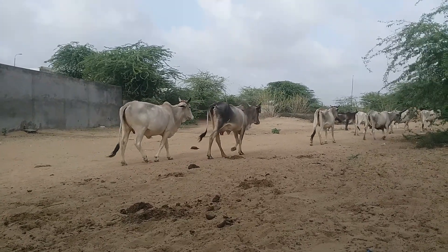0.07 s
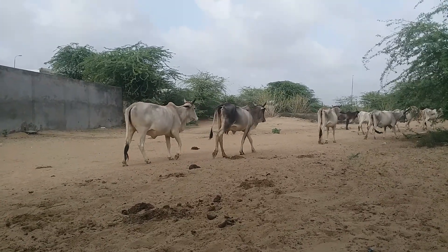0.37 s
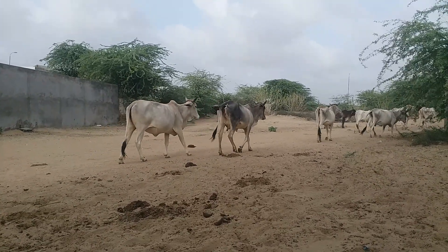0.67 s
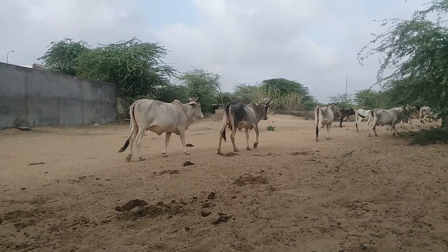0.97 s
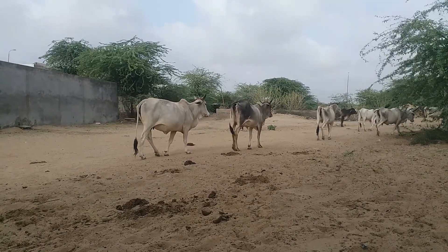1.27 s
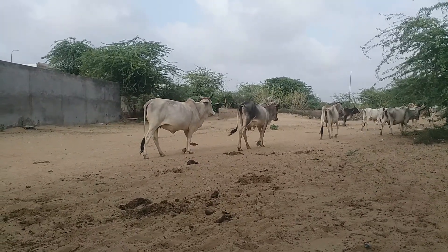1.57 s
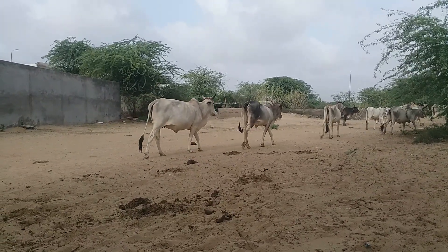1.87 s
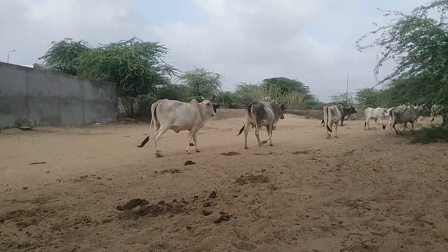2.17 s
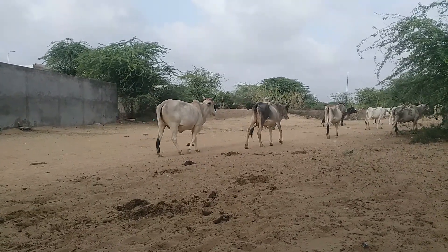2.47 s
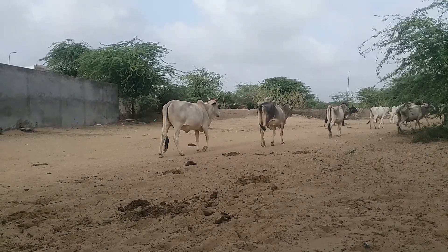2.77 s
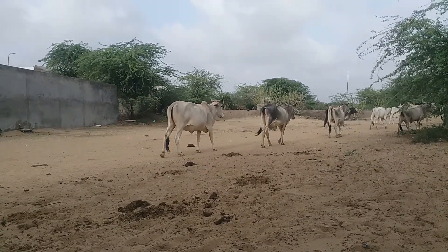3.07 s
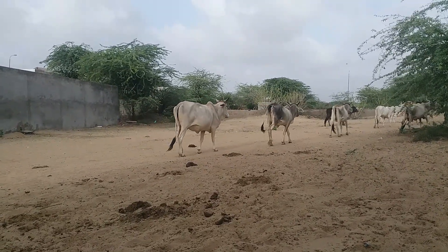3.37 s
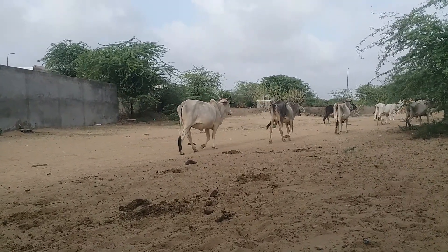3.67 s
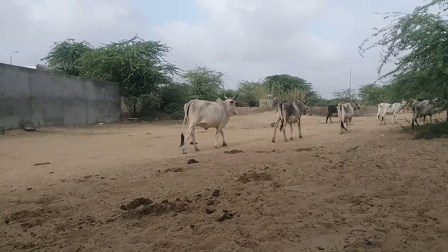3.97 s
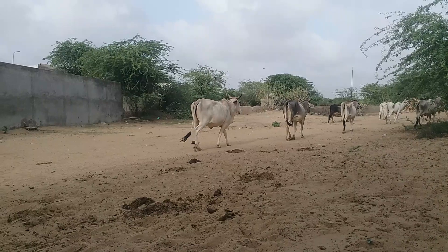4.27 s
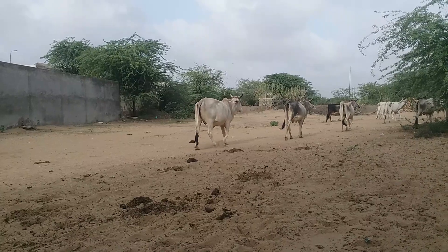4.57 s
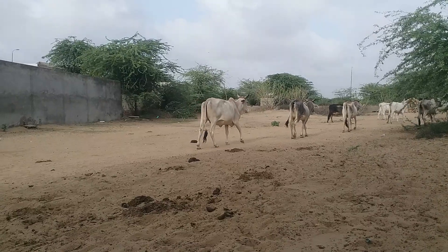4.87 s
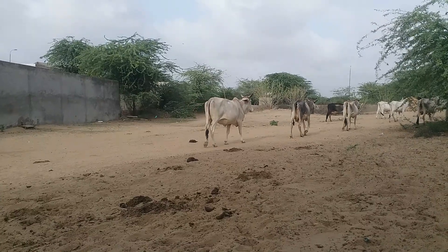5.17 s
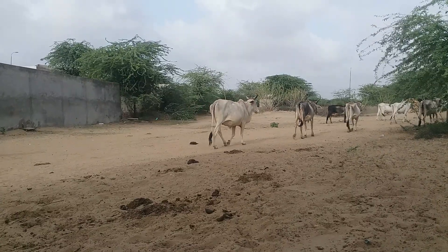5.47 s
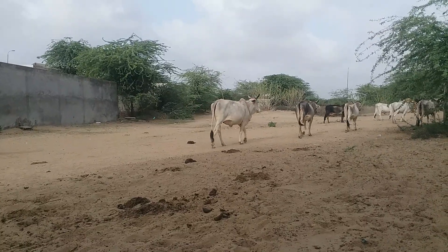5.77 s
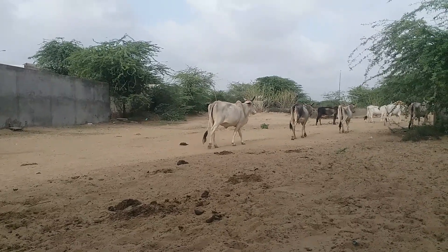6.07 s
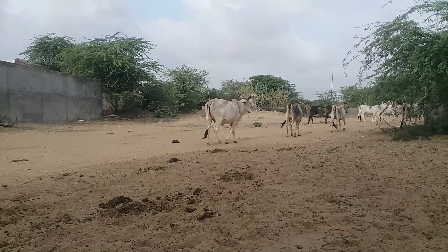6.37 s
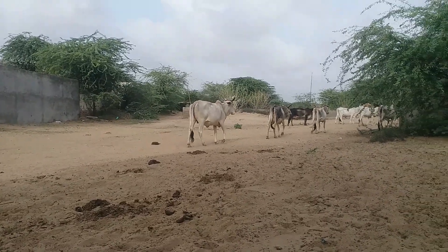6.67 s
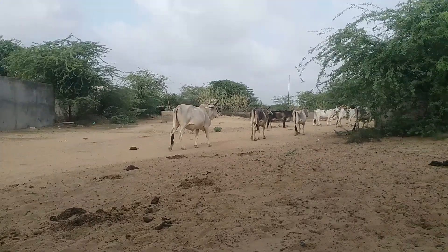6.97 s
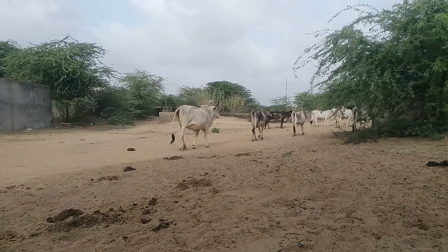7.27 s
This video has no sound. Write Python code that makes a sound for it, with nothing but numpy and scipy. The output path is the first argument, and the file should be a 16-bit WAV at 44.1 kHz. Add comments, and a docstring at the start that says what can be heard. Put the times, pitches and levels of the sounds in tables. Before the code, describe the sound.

In an open, dusty lot, small birds whistle short peeps and give raspy nasal calls from the trees over a faint distant chorus. A closer bird chirps three times. Low gusts of wind buffet the microphone, strongest early on and again past the middle. A few dry handling clicks sound up close, and a far engine hums faintly in the second half.

```python
"""A bird close to the microphone repeats a chirp, sweeping both sides of its syrinx at once.
Farther off in the thorn trees of a dusty village lot, small birds whistle and a flock rasps with
beating membranes, over a distant chorus; wall and foliage scatter a thin tail behind the calls.
Gusts buffet the microphone and the hand-held camera clicks. Far away an engine picks up speed
and thin tones come and go, above a floor of open air and microphone hiss."""
import sys
import numpy as np
from scipy import signal
from scipy.fft import rfft, irfft, next_fast_len
from scipy.io import wavfile
from scipy.ndimage import uniform_filter1d

SR = 44100
rng = np.random.default_rng(int(sys.argv[2]) if len(sys.argv) > 2 else 0)


def waveform_to_disk(signal):
    """Save audio, clipped to [-1, 1], as 16-bit WAV at the path in sys.argv[1]."""
    frames = np.transpose(np.atleast_2d(signal))
    scaled = np.clip(frames, -1, 1) * 32767
    samples = np.round(scaled).astype(np.int16)
    wavfile.write(sys.argv[1], SR, samples)


N = 326781
TIME = np.arange(N) / SR


def near_bird():
    """Close to the microphone, the two sides of one syrinx sweep at once, each on its own path."""
    # the chirps: t/s, level/dB
    chirps = [(1.154, -42.5), (3.693, -47), (6.014, -43)]
    # low and high side of the syrinx within a chirp: t/s, f/Hz, level/dB
    low_voice = [(.012, 2890, -6), (.022, 4355, -11.5), (.026, 4524, 0), (.031, 5400, 0.5),
                 (.035, 4430, -7), (.043, 3565, -14), (.049, 3010, -9), (.054, 3375, -1), (.062, 3553, -9),
                 (.067, 2594, -19), (.074, 3050, -3), (.083, 3364, 3), (.094, 4400, -17.5),
                 (.098, 3210, -2), (.106, 2480, -22)]
    high_voice = [(0, 6200, -23), (.018, 6900, -19), (.027, 9000, -52), (.044, 7100, -18),
                  (.049, 5220, -17), (.055, 6620, -17), (.062, 7050, -23), (.069, 4680, -7),
                  (.085, 7640, -43)]
    return song(low_voice, chirps, jitter=0.034) + song(high_voice, chirps, jitter=0.022)


def peeping_birds(arch=0.02, quaver_rad=0.62, quaver_hz=200, overtone_db=-34, ends_db=-5):
    """Small birds farther off whistle arched glides, almost pure and softer at their ends."""
    # the peeps: t/s, length/s, start f/Hz, end f/Hz, level/dB
    peeps = [(0, 0.033, 2450, 2600, -49), (0.073, 0.036, 2740, 2630, -57),
             (0.144, 0.047, 2660, 2363, -59.5), (0.279, 0.028, 2660, 2340, -59),
             (0.326, 0.043, 2630, 2330, -59.5), (.647, 0.031, 3320, 4030, -50),
             (0.731, 0.011, 3230, 4150, -61), (0.756, 0.0095, 5100, 2660, -59),
             (0.762, 0.037, 3320, 3060, -52.5), (.805, .02, 3740, 3470, -60),
             (0.953, 0.032, 3360, 3570, -54), (1.097, 0.038, 3400, 3200, -55.5),
             (1.135, .055, 2920, 2380, -53.5), (1.799, 0.022, 1490, 1380, -61),
             (1.956, 0.024, 3240, 2860, -56), (2.324, 0.018, 2760, 2900, -55.5),
             (2.344, 0.0302, 3300, 2490, -56), (2.449, .026, 2080, 2480, -51),
             (2.711, .014, 2400, 2600, -56), (3.446, 0.06, 2630, 2760, -57.5),
             (3.611, 0.04, 2930, 2470, -54.5), (3.939, 0.031, 3680, 3330, -62.5),
             (4.081, 0.06, 2404, 2500, -55), (4.351, 0.028, 2740, 2890, -55.5),
             (4.443, 0.023, 2980, 2780, -45.5), (4.708, 0.025, 1790, 2430, -59),
             (5.219, 0.031, 3025, 2970, -47.5), (5.342, 0.017, 2007, 2720, -54),
             (5.516, .057, 2730, 2360, -58), (5.722, 0.017, 3650, 3430, -57),
             (6.209, .01, 4820, 5200, -59.5), (6.52, .018, 2456, 2490, -58.5),
             (7.253, 0.026, 2170, 2500, -59.5), (7.382, 0.017, 2370, 2970, -52)]
    out = np.zeros(N)
    for s, length, start_hz, end_hz, db in peeps:
        middle_hz = (1 + arch) * (start_hz + end_hz) / 2
        phase, swell = whistle(length, start_hz, middle_hz, end_hz, taper=0.1)
        phase = phase + quaver_rad * drift(quaver_hz, len(phase))
        swell = unit(swell * amp(ends_db * np.linspace(-1, 1, len(phase)) ** 2))
        tone = np.sin(phase) + amp(overtone_db) * np.sin(2 * phase)
        add(out, s, np.sqrt(2) * amp(db) * swell * tone)
    return out


def warbling_bird():
    """Among the whistlers, one bird repeats a flick, an arch and an upturn."""
    # the warbles: t/s, level/dB
    warbles = [(5.844, -50.5), (6.183, -48.5)]
    # the voice within a warble: t/s, f/Hz, level/dB
    voice = [(0, 4385, -5), (.008, 2600, -3), (.018, 2767, 0.5), (.031, 3074, 2.5), (.044, 2590, 1.5),
             (.057, 2400, 5.5), (.08, 2600, 1), (.098, 2610, 2)]
    return song(voice, warbles, jitter=0.0099)


def raspy_flock(accent_width=0.3, easy_rough=0.32, easy_db=-6.5, waver=0.0121, droop=0.096, droop_s=0.0119):
    """Nasal calls some way off: loud and rough at the accent, purer at ease, drooping as they end."""
    # the calls: t/s, length/s, start, middle and end f/Hz, accent place/0-1, roughness/0-1, level/dB
    calls = [(0, 0.12, 1880, 2073, 2290, 0.96, .25, -55), (0.899, 0.11, 2306, 2376, 2270, 0.62, .5, -53.5),
             (1.188, .11, 2195, 1948, 2000, 0.6, 0.8, -52),
             (1.334, 0.11, 1917, 2030, 1950, 0.92, 0.5, -53.5),
             (2.399, 0.19, 1750, 2308, 2416, 0.48, .55, -50),
             (2.596, .14, 1540, 1740, 1820, 0.45, .6, -49.5),
             (2.804, 0.12, 1950, 2205, 2910, 0.74, 0.94, -50),
             (2.982, 0.1, 2223, 2146, 2110, 0.74, 0.56, -54.5),
             (4.214, 0.13, 2210, 2214, 2305, .6, 0.6, -49), (4.455, 0.19, 1993, 1936, 2126, 0.64, 0.7, -49),
             (5.605, .07, 2370, 2430, 2350, 0.53, 0.4, -51),
             (5.664, 0.11, 2080, 2220, 2340, 0.52, 0.56, -50),
             (5.866, 0.17, 1522, 1840, 1700, 0.44, 0.65, -49),
             (6.107, 0.12, 1873, 1887, 2605, 0.89, 0.5, -43.5),
             (6.318, 0.15, 1367, 1722, 1965, 0.77, 0.75, -49),
             (6.72, 0.0615, 1990, 1980, 2200, 0.26, 0, -61),
             (6.797, 0.065, 1154, 1197, 1150, 0.56, 1, -63.5)]
    out = np.zeros(N)
    for s, length, *pitches, accent, rough, db in calls:
        progress = np.linspace(0, 1, int(length * SR))
        ease = 1 - np.exp(-((progress - accent) / accent_width) ** 2)
        sag = droop * np.exp((progress - 1) * length / droop_s)
        hz = glide(pitches, progress) * (1 + waver * drift(45, len(progress)) - sag)
        tone = rough_syrinx(2 * np.pi * np.cumsum(hz) / SR, rough * (1 - (1 - easy_rough) * ease))
        add(out, s, amp(db + easy_db * ease) * signal.windows.tukey(len(tone), 0.12) * tone)
    return out


def rough_syrinx(phase, rough, beat_share=0.115, spread=0.54, rasp=0.8, flutter_hz=115, overtone_db=-30):
    """The membrane also beats at a fraction of the pitch, stacking nasal side tones."""
    sides, size = np.arange(-3, 6)[:, None], len(phase)
    phase = phase + 0.68 * drift(170, size)  # a fast quaver
    weight = (spread * np.sqrt(rough)) ** abs(sides)
    # each side tone flutters on its own, more so in a rougher call
    flutter = np.array([drift(flutter_hz, size) + 1j * drift(flutter_hz, size) for _ in sides])
    steady = np.exp(2j * np.pi * rng.random(sides.shape))
    loose = rasp * rough ** 3
    sway = np.sqrt(1 - loose) * steady + np.sqrt(loose / 2) * flutter
    partials = weight * sway * np.exp(1j * phase * (1 + beat_share * sides))
    tone = partials.sum(0) / np.linalg.norm(weight, axis=0)
    return unit((tone + amp(overtone_db) * tone ** 2).real)


def distant_chorus(wash_db=-1.5, slurs_db=-6, flicks_db=-10, twitter_db=-2):
    """The farthest birds merge into a wash, out of which slurs, flicks, twitter and chatter poke."""
    # swell of the chorus: t/s, level/dB
    chorus_level = [(0, -57.5), (.31, -69), (.5, -64), (1.3, -59), (2.27, -62.5), (2.8, -57), (3.15, -61.5),
                    (4.4, -58), (5.0, -59), (6.15, -55.5), (7.04, -64.5), (7.41, -60)]
    # spectrum of its wash: f/Hz, level/dB
    wash_spectrum = [(500, -9.5), (1000, -5.5), (1500, -4), (2000, -0.5), (2500, 0), (3100, -2.5),
                     (3800, -9.5), (5000, -13.5), (6200, -23.5), (7200, -24.5), (8500, -32)]
    # small birds high in the bushes: t/s, level/dB
    twitter_level = [(0, -78.5), (1.0, -78.5), (2.0, -74.5), (2.9, -72.5), (3.4, -79), (4.25, -68.5),
                     (4.45, -75.5), (4.63, -61.5), (4.9, -76.5), (6.2, -74.5), (7.4, -80)]
    # a far flock of lower voices: t/s, level/dB
    chatter_level = [(0, -69), (.3, -80), (4.4, -76), (4.9, -70), (5.4, -66), (6.0, -66), (6.6, -75),
                     (7.4, -70)]
    slurs = amp(slurs_db) * far_notes(2000, 2950, bend=0.163, length=0.0358, count=260)
    flicks = amp(flicks_db) * far_notes(2108, 3230, bend=0.338, length=0.0168, count=120)
    twitter = amp(twitter_db) * far_notes(3700, 6400, bend=0.12, length=0.026, count=1100)
    chatter = far_notes(1300, 1780, bend=0.13, length=0.055, count=300)
    wash = amp(wash_db) * noise(wash_spectrum)
    return (amp(curve(chorus_level, TIME)) * (wash + slurs + flicks)
            + amp(curve(twitter_level, TIME)) * twitter
            + amp(curve(chatter_level, TIME)) * chatter)


def far_notes(low_hz, high_hz, bend, length, count, spread_db=3):
    """Distant birds whistle short notes at random moments and pitches, blurred by the trees."""
    out = np.zeros(N)
    notes, shapes = rng.random((count, 3)), rng.uniform(-0.82, 1, (count, 3))
    for (when, pitch, stretch), (start, end, strength) in zip(notes, shapes):
        hz = low_hz * (high_hz / low_hz) ** pitch
        start_hz, end_hz = hz * (1 + bend * start), hz * (1 + bend * end)
        phase, swell = whistle(length * (0.5 + stretch), start_hz, hz, end_hz, taper=0.39)
        add(out, when * N / SR, amp(spread_db * strength) * swell * np.cos(phase))
    return unit(trees(out, t60=0.16, wet_db=-11.5))


def wind(lumps_db=2, lump_hz=30, thump_s=0.01, thump_rush_db=-14, rush_db=0.5, calm_db=-71):
    """Eddies beat on the microphone in lumps; strong gusts add a brighter rush."""
    # the gusts: t/s, buffet level/dB, rush level/dB
    gusts = [(0, -64, -69.5), (1.07, -64.5, -76.5), (1.19, -48.5, -66), (1.46, -39.5, -51),
             (1.67, -43, -53.5), (2.18, -37, -43.5), (2.43, -42, -50), (2.8, -38.5, -49.5),
             (3.04, -51.5, -62.5), (3.32, -60, -70), (3.95, -49.5, -61.5), (4.22, -49.5, -65),
             (4.43, -39.5, -50), (4.66, -52, -69), (4.95, -59.5, -64), (5.8, -58, -63.5),
             (5.95, -48.5, -62), (6.2, -44.5, -63.5), (6.33, -56.5, -68.5), (7.18, -68.5, -70),
             (7.41, -45.5, -57.5)]
    # single eddies that thump the microphone: t/s, level/dB
    strikes = [(1.42, -33.5), (1.538, -34), (2.52, -32), (2.759, -34), (2.871, -35.5), (4.062, -43),
               (4.302, -37), (4.489, -41), (4.59, -43)]
    # spectra of the buffeting and the rush: f/Hz, level/dB
    buffet_spectrum = [(10, -40), (30, -17), (60, -5.5), (120, 2), (180, -1.5), (280, -4), (400, -14),
                       (600, -27), (1200, -35), (3000, -82)]
    rush_spectrum = [(100, -21), (250, -6), (400, 5.5), (550, 2), (800, -7), (1200, -15), (2000, -29),
                     (4000, -26), (9000, -60)]
    eddies = drift(lump_hz)
    quick_eddies = unit(eddies - uniform_filter1d(eddies, size=6000))
    lumps = unit(amp(lumps_db * quick_eddies))
    thumps = sum(amp(db) * np.exp(-((TIME - s) / thump_s) ** 2 / 2) for s, db in strikes)
    buffet = np.hypot(amp(curve(gusts, TIME)) * lumps, thumps)
    strength = np.hypot(amp(curve(gusts, TIME, column=2)) * lumps, amp(thump_rush_db) * thumps)
    rush = strength ** 2 / (strength + amp(calm_db))  # dies away in the lulls
    return buffet * noise(buffet_spectrum) + amp(rush_db) * rush * noise(rush_spectrum)


def handling(grit_decay_s=0.0033):
    """Right at the microphone: dry, heavily damped clicks of the camera body and crackles of grit."""
    # clicks of the casing: t/s, level/dB, f/Hz, decay/s
    clicks = [(.2464, -32, 800, .00021), (3.4746, -34, 1900, .0003), (3.489, -43, 1400, .0003),
              (6.2367, -29, 1000, .00016)]
    # crackles of grit: t/s, level/dB
    crackles = [(.2464, -58), (1.2966, -60), (1.422, -51.5), (1.8458, -46.5), (1.862, -53), (2.284, -62),
                (3.685, -60), (3.7305, -57), (4.297, -55), (6.292, -58), (6.317, -51), (6.3954, -55)]
    # their spectrum: f/Hz, level/dB
    grit_spectrum = [(800, -45), (2800, 18.5), (5000, 0), (9000, -2.5), (15000, -7)]
    out, t = np.zeros(N), np.arange(SR // 50) / SR
    fizz = noise(grit_spectrum)
    for s, db, hz, decay in clicks:
        envelope = t / decay * np.exp(1 - t / decay)
        add(out, s, -amp(db) * envelope * np.sin(2 * np.pi * hz * t))
    for s, db in crackles:
        add(out, s, amp(db) * fizz[int(s * SR):][:len(t)] * np.exp(-t / grit_decay_s))
    return out


def far_engine(waver=0.0061, throb=0.21, uneven_db=8, uneven_from_s=4.6, uneven_ramp_s=0.42):
    """Only the lowest orders carry this far; at speed the firing turns uneven and a half order grows."""
    # the engine's run: t/s, firing f/Hz, level/dB
    run = [(3.7, 56, -104), (4.1, 55.9, -63), (4.7, 60.34, -69.5), (5.2, 65.84, -56.5), (5.6, 67.44, -56.5),
           (6.0, 70.4, -61), (6.5, 73.25, -61.5), (6.8, 72.3, -90)]
    # its orders: multiple of the firing rate, level/dB
    orders = [(1, 2), (1.5, -5), (2, -2.5), (3, -6.5), (4, -12.5), (5, -24)]
    firings = np.cumsum(curve(run, TIME) * (1 + waver * drift(10.4))) / SR
    evenness = 1 - np.clip((TIME - uneven_from_s) / uneven_ramp_s, 0, 1)
    hum = np.zeros(N)
    for multiple, db in orders:
        cut_db = uneven_db * evenness if multiple % 1 else 0
        hum += amp(db - cut_db) * np.sin(2 * np.pi * multiple * firings)
    return np.sqrt(2) * amp(curve(run, TIME, column=2)) * hum * (1 + throb * drift(5.8))


def far_whines(waver=0.00199):
    """Thin, nearly steady tones come and go far off, the high ones likely an insect."""
    # the spells of tone: t/s, length/s, f/Hz, level/dB
    spells = [(0.686, 0.39, 955, -74), (1.12, 0.44, 998, -67), (1.49, 0.14, 5880, -73.5),
              (3.48, 0.19, 5913, -82), (5.42, 0.14, 5870, -72), (5.757, 0.049, 5930, -70),
              (6.09, 0.2, 5970, -69.5), (6.078, 0.18, 8940, -82)]
    out = np.zeros(N)
    wavering_time = np.cumsum(1 + waver * drift(80)) / SR
    for s, length, hz, db in spells:
        t = wavering_time[int(s * SR):][:int(length * SR)]
        add(out, s, amp(db) * signal.windows.tukey(len(t), 0.5) * np.sin(2 * np.pi * hz * t))
    return out


def open_air(level_db=-66):
    """The steady, low background of the lot."""
    # its spectrum: f/Hz, level/dB
    spectrum = [(20, -1.5), (60, 13), (130, -1.5), (250, -20), (500, -6.5), (1000, -13.5), (2500, -33),
                (4500, -16.5), (7000, -49), (10000, -31.5), (16000, -38)]
    return amp(level_db) * noise(spectrum)


def microphone_hiss(chirps, gain_db=2, knee_db=-50, flicker_db=1.65):
    """The microphone's hiss flickers a little and swells briefly under each loud chirp."""
    # slow course of the hiss: t/s, level/dB
    course = [(0, -76.5), (.9, -79.5), (1.63, -74.5), (2.91, -73.5), (3.32, -77.5), (4.91, -76.5),
              (6.29, -74), (6.77, -78.5), (7.41, -78)]
    # its spectrum: f/Hz, level/dB
    spectrum = [(3000, -41), (6000, 1), (8000, -3.5), (10500, -8), (11500, -5), (12800, 0), (15500, 0)]
    loudness = np.sqrt(abs(uniform_filter1d(chirps ** 2, SR // 40)))
    swell = 1 + loudness / (loudness + amp(knee_db))
    return amp(curve(course, TIME) + gain_db + flicker_db * drift(15)) * swell * noise(spectrum)


def trees(x, t60, wet_db):
    """The wall and the foliage scatter a thin tail behind each call."""
    t = np.arange(SR // 2) / SR
    # about 2000 echoes a second, from 6 ms on
    echoes = rng.standard_normal(len(t)) * (rng.random(len(t)) < 2000 / SR) * (t > 0.006)
    tail = echoes * np.exp(-np.log(1000) * t / t60)
    return x + amp(wet_db) * signal.fftconvolve(x, tail / np.linalg.norm(tail))[:N]


def song(voice, repeats, jitter):
    """One voice sweeps through its figure at each repeat, a little differently each time."""
    out, t = np.zeros(N), np.arange(int(voice[0][0] * SR), int(voice[-1][0] * SR)) / SR
    for s, db in repeats:
        hz = curve(voice, t) * (1 + jitter * drift(600, len(t)))
        level = amp(db + curve(voice, t, column=2)) * signal.windows.tukey(len(t), 0.1)
        add(out, s + t[0], np.sqrt(2) * level * np.sin(2 * np.pi * np.cumsum(hz) / SR))
    return out


def whistle(length, start_hz, middle_hz, end_hz, taper):
    """Phase and envelope of a tone that bends through three pitches and is loudest midway."""
    progress = np.linspace(0, 1, max(int(length * SR), 64))
    hz = glide([start_hz, middle_hz, end_hz], progress)
    swell = 1 - 0.3 * np.cos(2 * np.pi * progress)
    return 2 * np.pi * np.cumsum(hz) / SR, signal.windows.tukey(len(hz), taper) * swell


def glide(pitches, progress):
    """A parabola through a start, middle and end pitch."""
    return np.polyval(np.polyfit([0, 0.5, 1], pitches, 2), progress)


def noise(spectrum):
    """Noise of unit rms with the given spectrum."""
    size = next_fast_len(N)
    hz, db = np.transpose(spectrum)
    gain = amp(np.interp(np.log(np.fft.rfftfreq(size, 1 / SR) + 1), np.log(hz), db))
    return unit(irfft(rfft(rng.standard_normal(size)) * gain, size)[:N])


def drift(rate_hz, size=N):
    """Smooth random wander of about unit rms, up to the given rate."""
    padded = next_fast_len(size + 2048)
    gain = np.exp(-(np.fft.rfftfreq(padded, 1 / SR) / rate_hz) ** 2)
    return unit(irfft(rfft(rng.standard_normal(padded)) * gain, padded))[:size]


def amp(db):
    """Decibels to gain."""
    return 10 ** (np.asarray(db) / 20)


def unit(x):
    """Scales to an rms of one."""
    return x / np.sqrt(np.mean(x ** 2) + 1e-20)


def curve(rows, t, column=1):
    """One column of a table, joined by straight lines in time."""
    rows = np.asarray(rows)
    return np.interp(t, rows[:, 0], rows[:, column])


def add(mix, s, sound):
    """Mixes a sound in at s seconds."""
    part = mix[max(0, round(s * SR)):][:len(sound)]
    part += sound[:len(part)]


def scene():
    """One microphone in the lot: birds near and far, wind and handling up close, a faint background."""
    chirps = trees(near_bird(), t60=0.19, wet_db=-8.5)
    whistlers = trees(peeping_birds() + warbling_bird(), t60=0.22, wet_db=-10.5)
    flock = trees(raspy_flock(), t60=0.48, wet_db=-9)
    birds = chirps + whistlers + flock + distant_chorus()
    surroundings = far_whines() + wind() + far_engine() + handling() + open_air()
    return (birds + surroundings + microphone_hiss(chirps))[None]


def record(dry, edge_hz=15850):
    """The recorder's band limit cuts the top treble."""
    lowpass = signal.firwin(511, edge_hz, window=("kaiser", 9), fs=SR)
    return signal.oaconvolve(dry, lowpass[None], "same")


dry = scene()
out = record(dry)
waveform_to_disk(out)
```